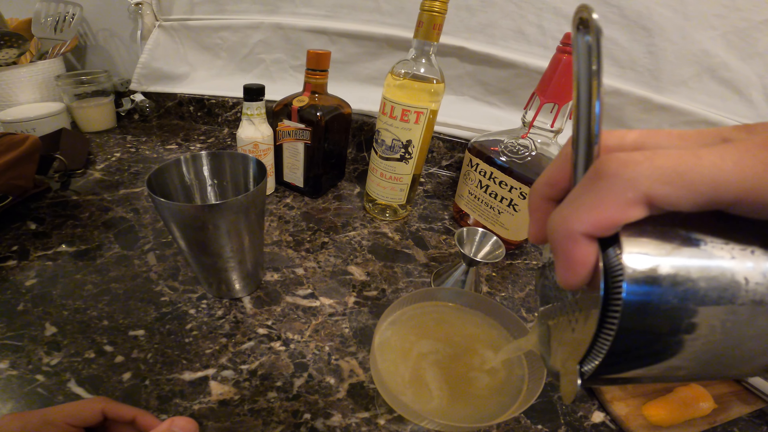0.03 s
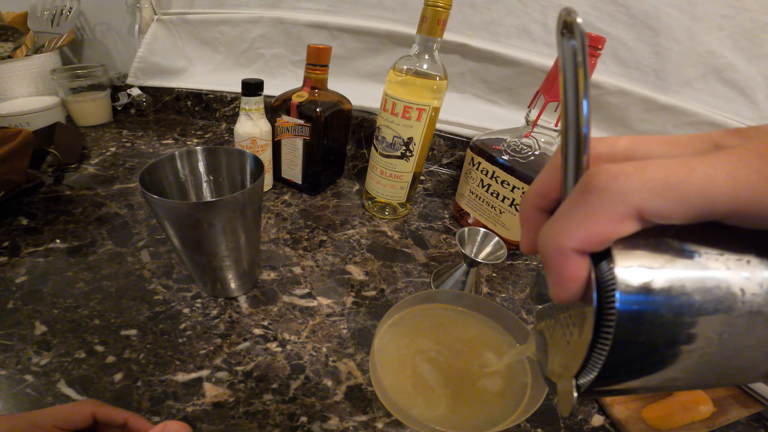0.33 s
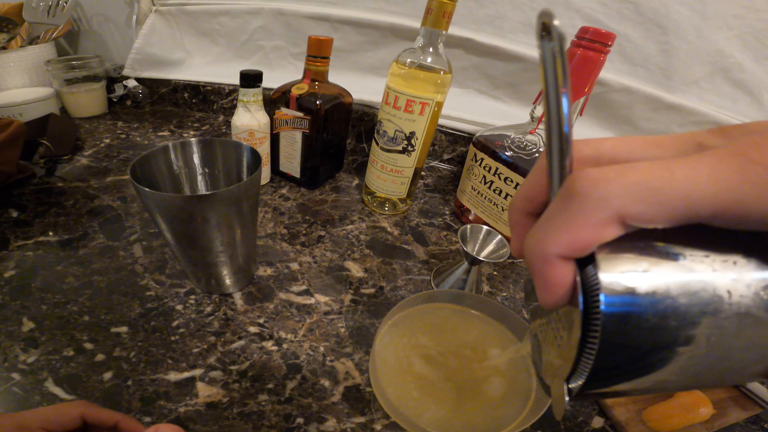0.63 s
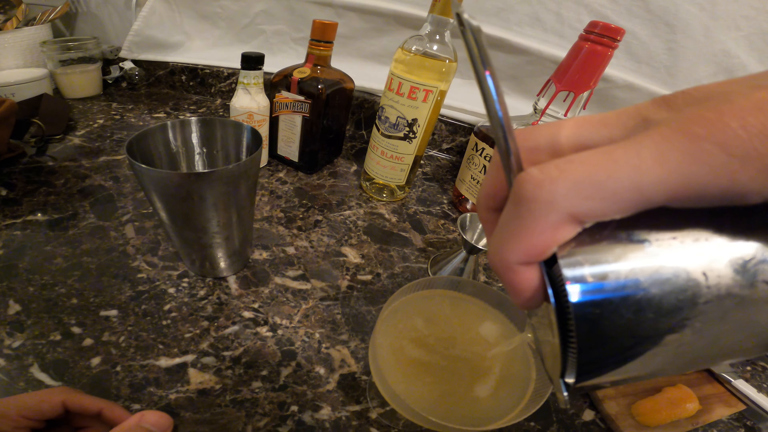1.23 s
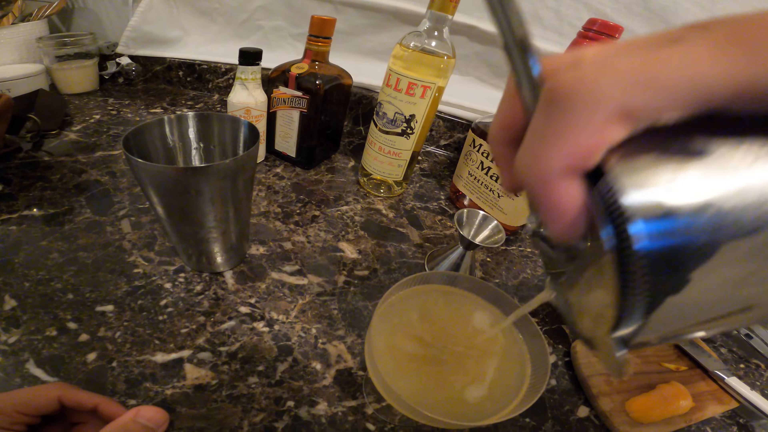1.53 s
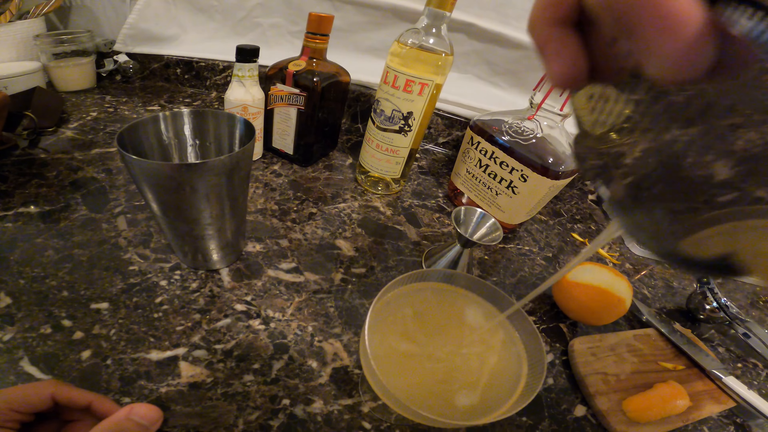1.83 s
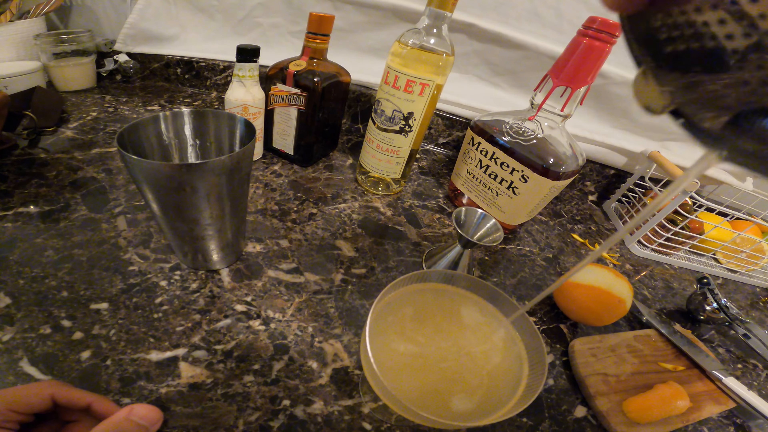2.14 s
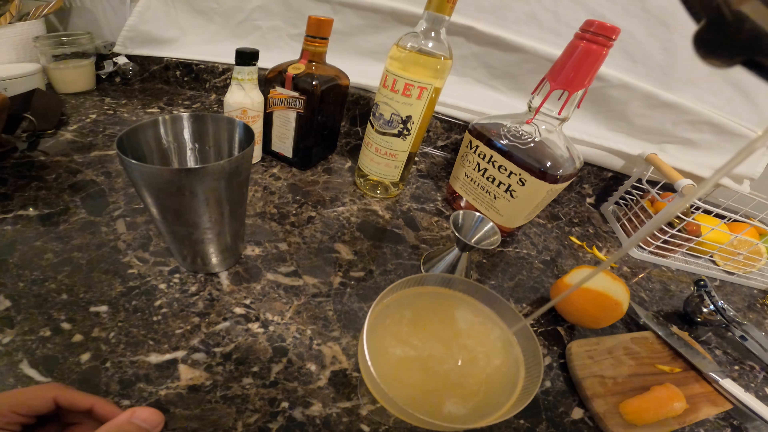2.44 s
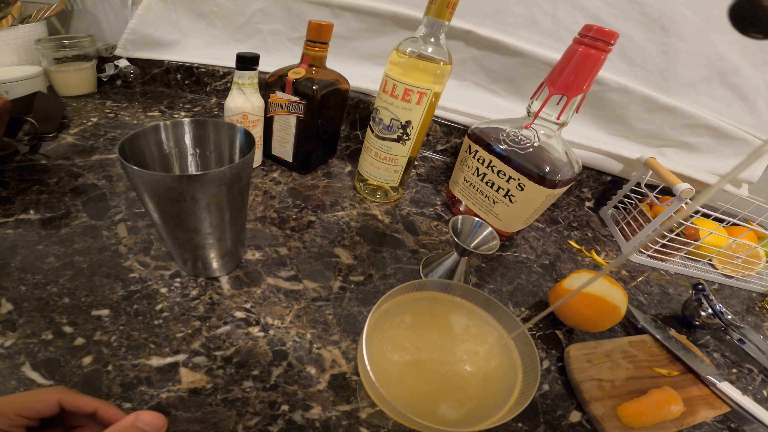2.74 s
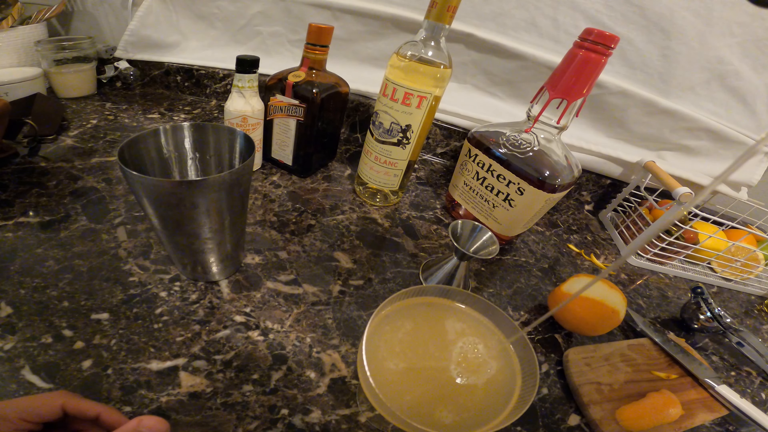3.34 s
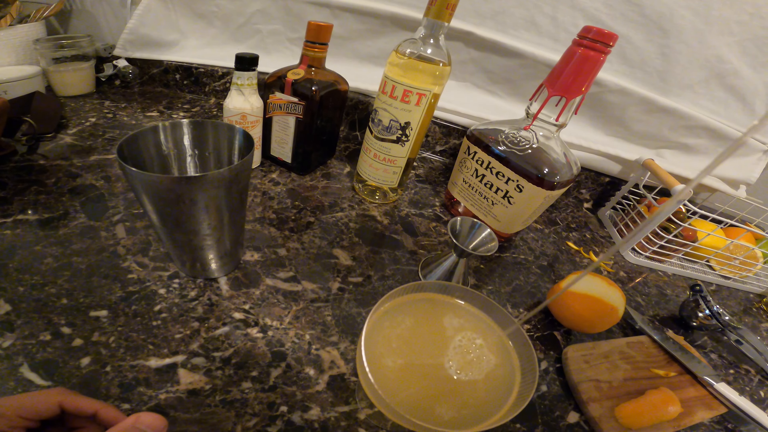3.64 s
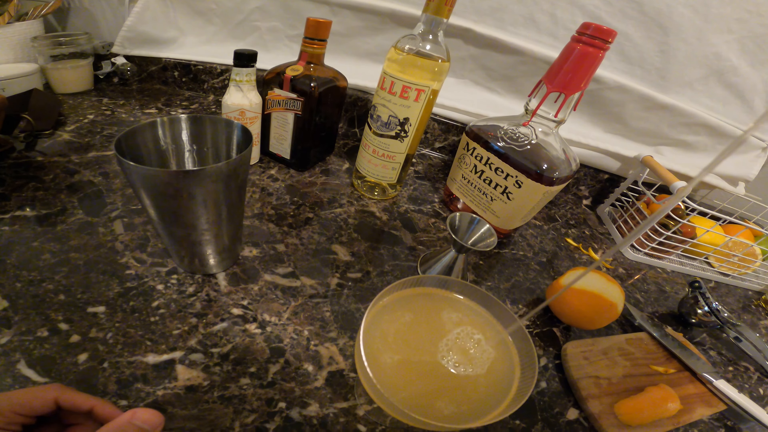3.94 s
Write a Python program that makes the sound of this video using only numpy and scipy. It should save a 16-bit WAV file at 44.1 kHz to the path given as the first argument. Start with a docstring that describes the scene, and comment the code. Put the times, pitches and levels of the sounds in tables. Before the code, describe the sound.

Close drops of a strained cocktail splash and bubble into a partly filled glass. They start past halfway, after an almost silent pour with a few soft ice ticks, while a low kitchen hum runs throughout.

```python
"""A kitchen hum and a swelling low rumble come first, with a faint trickle and ticks of ice: a cocktail
shaker drains almost silently into a cup on a stone counter. As it is lifted high, the stream breaks into
drops, at about 2.5 s. Each impact radiates a short slap, and trapped air rings as bubbles, amid spray
and fizzing foam. The cup resonates, and the counter and the room add their reflections."""
import sys
import numpy as np
from scipy import signal
from scipy.fft import rfft, irfft
from scipy.io import wavfile

SR = 44100
rng = np.random.default_rng(int(sys.argv[2]) if len(sys.argv) > 2 else 0)


def to_wav(sig):
    """Store sig (one row per channel, or 1-D mono) as 16-bit WAV at the path in sys.argv[1].

    Samples outside -1..1 are clipped; the rate is SR.
    """
    pcm = np.clip(np.atleast_2d(sig), -1, 1) * 32767
    pcm = np.round(pcm).astype(np.int16)
    wavfile.write(sys.argv[1], SR, pcm.T)  # frames by channels


N = 176400
TIME, FREQS = np.arange(N) / SR, np.fft.rfftfreq(N, 1 / SR)

# Levels in the tables are relative: each source applies its own gain.
# Bubbles trapped by large drops. Each row: start in seconds, pitch in Hz, level in dB,
# rise in fractions of the pitch per second, swell in ms, decay in ms.
TRAPPED_BUBBLES = [(2.4688, 2715, -20, -4, 0.11, 2.7), (2.4688, 3315, -16, 29, 3, 0.56),
                   (2.5012, 1690, -21.5, -10, 0.094, 4.5), (2.5076, 3010, -18.5, -4, 3.7, 0.32),
                   (2.6335, 1370, -33, 14.5, 0.041, 5.8), (2.7274, 1104, -22, 10.5, 0.12, 6.4),
                   (2.7509, 899, -32.5, 22.5, 0.2, 21), (2.7664, 2750, -18.5, 6, 0.26, 0.83),
                   (2.7738, 770, -27.5, 40, 0.99, 4.3), (2.7783, 928, -20, 75, 6.4, 2.6),
                   (2.7968, 1176, -28.5, 3, 8.3, 2), (2.7993, 1560, -23.5, 56, 0.51, 3.1),
                   (2.844, 1160, -20.5, 9, 0.078, 4), (2.8809, 2656, -21, 8, 0.044, 4),
                   (2.885, 1129, -25, 19, 12.5, 3.2), (2.931, 1099, -26.5, 19.5, 0.13, 9.5),
                   (2.9596, 830, -24.5, 51, 11, 5.1), (2.9917, 2690, -23, 10, 0.24, 2),
                   (2.9922, 1220, -20.5, 11, 0.63, 5.1), (2.9896, 1800, -23.5, 9.5, 0.22, 5.3),
                   (3.052, 2780, -11.5, 31, 0.53, 0.55), (3.051, 796, -29.5, 55, 0.36, 12),
                   (3.0607, 990, -18.5, 50.5, 7.4, 1.5), (3.0777, 2726, -24.5, 30, 0.13, 2),
                   (3.0894, 1080, -24, 67, 0.41, 2.8), (3.1545, 1853, -31, 1.5, 0.33, 5.6),
                   (3.1584, 1004, -23, -9, 1.4, 2.4), (3.1793, 1054, -14.5, 66, 3.9, 0.88),
                   (3.192, 966, -22.5, 40, 6.4, 3.2), (3.235, 1193, -26, 48, 4, 2),
                   (3.2696, 805, -29, 23, 0.11, 7.8), (3.2961, 817, -21, 31.5, 0.14, 3.2),
                   (3.2888, 1827, -29, 16.5, 8, 5), (3.3483, 2950, -26, 18, 1.48, 1.2),
                   (3.3724, 2724, -23.5, 18, 0.17, 1.2), (3.3958, 873, -30, 10.5, 0.69, 33),
                   (3.3956, 1280, -23.5, 56, 0.53, 2.1), (3.4215, 963, -29, -19.5, 0.44, 7.5),
                   (3.4613, 900, -29.5, 18, 0.12, 8.8), (3.497, 1183, -20.5, 67, 2.3, 3.3),
                   (3.6792, 1620, -15.5, 45, 0.14, 1.35), (3.6996, 957, -22.5, 39, 3.4, 4.2),
                   (3.7024, 2260, -19, -6, 0.28, 0.66), (3.8003, 2570, -20, 74, 0.58, 1),
                   (3.8218, 2510, -19.5, 39, 0.25, 1.7), (3.8305, 2290, -11, 23, 0.17, 1.7),
                   (3.849, 1177, -24.5, 2, 0.16, 4), (3.9926, 830, -21.5, 31, 4.3, 0.85)]
# Wet slaps of drops, some with a bubble ringing alongside. Each row: start in seconds, level in dB.
SMACK_HITS = [(2.633, -44.5), (2.715, -46), (2.7272, -32.5), (2.748, -45), (2.761, -38), (2.835, -41),
              (2.844, -31.5), (2.852, -40), (2.859, -44), (2.9321, -54), (2.979, -35), (3.0107, -36),
              (3.063, -35.5), (3.0904, -36), (3.154, -33.5), (3.187, -33), (3.2233, -32), (3.2615, -34),
              (3.286, -33), (3.3144, -35), (3.3961, -33), (3.4147, -38.5), (3.4607, -36), (3.473, -32.5),
              (3.5244, -31.5), (3.566, -36), (3.6207, -42), (3.6345, -38), (3.6421, -40), (3.655, -48),
              (3.752, -35), (3.7574, -41), (3.7736, -36), (3.795, -29.5), (3.848, -51), (3.872, -40),
              (3.9042, -31), (3.9767, -43), (3.9935, -35)]
# Drops that burst on the surface. Each row: start in seconds, level in dB, pitch in Hz.
SPLASH_HITS = [(2.4684, -29, 5380), (2.483, -49, 6400), (2.507, -40, 5270), (2.6344, -43.5, 6600),
               (2.746, -53, 5620), (2.765, -45, 4900), (2.8349, -46, 5670), (2.8637, -37.5, 6800),
               (2.8802, -36, 4470), (2.916, -44.5, 4870), (2.97, -42.5, 4500), (2.9696, -38, 4900),
               (3.01, -44, 5540), (3.0506, -36, 6400), (3.0886, -40.5, 5000), (3.1332, -38.5, 4300),
               (3.1862, -37, 6000), (3.226, -50, 4060), (3.2447, -35, 9670), (3.2627, -34, 5240),
               (3.3485, -36.5, 6055), (3.3733, -37.5, 6740), (3.4163, -41, 5760), (3.4622, -42.5, 5600),
               (3.4975, -41.5, 6500), (3.552, -39, 5100), (3.5671, -36, 5250), (3.6064, -40, 5820),
               (3.6677, -38.5, 5550), (3.7432, -36, 5510), (3.783, -39.5, 5120), (3.752, -42.5, 8400),
               (3.8716, -43.5, 5000), (3.914, -38.5, 5900), (3.9507, -41, 4560), (3.977, -40.5, 4700)]
# Ice against the strainer. Each row: start in seconds, level in dB, pitch in Hz, decay in ms.
ICE_TICKS = [(0.144, -56, 7100, 1.2), (.267, -57, 5600, .4), (.368, -58, 6000, .4), (.543, -50, 2186, 6),
             (.578, -54, 2100, 6), (0.949, -51, 2780, .2), (1.335, -48, 2700, .2), (1.425, -50, 2500, .2),
             (1.891, -54, 4520, 0.81)]
# Envelopes of the flow. Each row: time in seconds, level in dB.
PATTER_LEVEL = [(2.7, -19), (2.74, -5.5), (2.83, -15.5), (2.91, -12), (2.99, -3.5), (3.08, 1), (3.13, -7),
                (3.29, -5), (3.38, -5.5), (3.55, -6), (3.65, -3), (3.8, -1), (3.93, -5), (4.0, -0.5)]  # the broken stream
TRICKLE_LEVEL = [(0, -68), (.14, -70.5), (.24, -75), (0.451, -78), (1.001, -77), (1.07, -71.5), (1.3, -78),
                 (1.7, -100)]  # the drink in the strainer
# Strength of small bubbles by size. Each row: pitch in Hz, level in dB.
FROTH_LEVELS = [(550, -44), (950, -27), (1300, -25.5), (1900, -34), (2900, -23), (4000, -41), (5500, -46),
                (8000, -48), (12000, -51)]
BEAD_LEVELS = [(4300, -31), (5800, -41), (8000, -37), (10500, -44), (13500, -48)]  # the tiniest, which ping
# Spectral envelopes. Each row: frequency in Hz, gain in dB.
SMACK_SPECTRUM = [(350, -33), (1100, 10), (1700, 2), (2900, 4.5), (4100, -16), (5500, -19), (9000, -18),
                  (15000, -35)]
SPRAY_SPECTRUM = [(300, -42), (900, 3), (3000, 1.5), (4000, -22), (6000, -20), (10000, -25), (13000, -14),
                  (16000, -46)]
FIZZ_SPECTRUM = [(400, -22), (1000, -8), (3000, 13.5), (4000, 0), (5500, 4.5), (8000, -12.5),
                 (10000, -11.5), (13000, -18), (16000, -25)]
TRICKLE_SPECTRUM = [(1000, -28), (4000, -4), (5600, -4), (7500, -3), (9000, -15), (13000, -14),
                    (15000, -38)]
AIR_SPECTRUM = [(12, -41), (22, -4), (42, 4), (62, -4.5), (92, -2), (135, -5.5), (170, -2.5), (194, -9),
                (220, 1.5), (280, 1.5), (350, -9), (460, -9), (640, -16.5), (950, -17.5), (1300, -21),
                (1650, -24), (2000, -31.5), (2600, -32), (3500, -37.5), (4200, -41), (5200, -37),
                (6300, -43), (8000, -47), (10000, -50.5), (12500, -52.5), (14000, -82.5), (16000, -89.5)]
MIC_RESPONSE = [(7000, 0), (10200, -1), (11500, -5), (13500, -8), (16000, -16)]
# Modes of the cup. Each row: frequency in Hz, bandwidth in Hz, gain in dB.
CUP_RESONANCES = [(472, 17, 10.5), (592, 18, 12.5), (843, 3.1, -2), (896, 8.1, 3), (954.3, 11.3, 5),
                  (1123, 6.6, 5.5), (1178, 1.4, -2), (1220, 2.5, -9), (1632, 7.4, -9), (2010, 26, 4.5),
                  (1885, 29, -7), (2290, 17, -1), (2623, 26, -1.5), (3200, 21, -4)]
# Resonances of a fan. Each row: frequency in Hz, half-width in Hz, level in dB.
FAN_RESONANCES = [(166, 10, -58), (226.3, 7, -49), (243.4, 7.8, -60.5), (288, 37, -53.5), (3286, 50, -76.5),
                  (3680, 36, -78.5)]
# Tones of a motor, likely the fridge. Each row: frequency in Hz, level in dB.
MOTOR_TONES = [(446.8, -72.5), (829.0, -74), (888.2, -67), (1244, -66.5), (1303, -74.5), (1362, -73),
               (1421, -77), (1534, -74.5), (1593, -71.5), (1771, -86.5), (2067, -82), (2304, -78),
               (4845, -81), (5243, -91)]
# Course of the low rumble. Each row: time in seconds, level in dB, pitch in Hz.
RUMBLE_COURSE = [(0.0, -29, 36.2), (0.24, -49.5, 39.5), (0.58, -53, 35.1), (1.02, -52, 41.65),
                 (1.21, -33, 41.8), (1.41, -46.5, 39.24), (1.71, -27, 37.7), (2.19, -48.5, 38.1),
                 (2.31, -75, 39), (2.78, -55, 37.3), (2.92, -48, 42.1), (3.12, -47, 41.88),
                 (3.23, -30.5, 39.5), (3.71, -36, 37.47), (3.88, -51, 39), (4.0, -42, 35)]
# Reverberation. Each row: frequency in Hz, time to fall by 60 dB in seconds.
NEAR_T60 = [(200, 0.1), (1000, 0.061), (3000, 0.04), (6000, 0.068), (14000, 0.033)]  # cup, bottles and counter
ROOM_T60 = [(200, 0.18), (1000, 0.67), (3000, 0.34), (6000, 0.4), (14000, 0.11)]
# Coherence of the air noise. Each row: frequency in Hz, correlation of left and right.
AIR_COHERENCE = [(60, 0.85), (110, 0.9), (180, 1), (320, 0.94), (570, 0.88), (1000, 0.39), (1750, 0.55),
                 (3070, 0.31)]
# Stereo balance. Each row: frequency in Hz, left minus right level in dB.
CUP_BALANCE = [(300, -4), (520, 3.5), (1050, -0.5), (1500, -4), (2150, 0.5), (3070, .5), (4500, -5.5),
               (7000, -6.5), (10000, -9.5)]
HUM_BALANCE = [(60, 1), (93, -0.5), (140, 2.5), (220, 0.5), (340, 0), (530, 7), (830, 2), (1280, 5.0),
               (1980, 4), (3070, 1)]


def drops():
    """Impact and air entrainment: a drop slaps and leaves a bubble; a slow swell has hardly any slap."""
    bubbles, slaps = np.zeros((2, N))
    for start, hz, db, rise, swell_ms, decay_ms in TRAPPED_BUBBLES:
        add(bubbles, start, amp(db) * ring(hz, rise, swell_ms, decay_ms))
        add(slaps, start, amp(db - 10) / (1 + swell_ms ** 2) * crack(decay_ms=0.14, snap_db=-7))
    return bubbles + colour(slaps, SPRAY_SPECTRUM)


def ring(hz, rise, swell_ms, decay_ms):
    """A damped oscillator swells and dies; positive rise is the climb of a bubble nearing the surface."""
    t = np.arange(SR // 16) / SR
    ms = t * 1000
    swell_ms = max(swell_ms, .05)
    swell = np.minimum(ms / swell_ms, 1) ** 1.75
    decay = np.exp(-np.maximum(ms - swell_ms, 0) / decay_ms)
    pitch = np.minimum(hz * (1 + rise * t), SR / 2)
    return swell * decay * np.sin(2 * np.pi * np.cumsum(pitch) / SR)


def crack(decay_ms, snap_db):
    """An impact is broadband: one pulse at contact, then exponentially decaying noise."""
    ms = np.arange(SR // 32) * 1000 / SR
    burst = rng.standard_normal(len(ms)) * np.exp(-ms / decay_ms) * (ms > 0)
    return burst + 2 * amp(snap_db) * (ms == 0)


def smacks():
    """Impact noise: drops hit the drink with wet, pitchless slaps, each a pulse and a short splatter."""
    out = np.zeros(N)
    for start, db in SMACK_HITS:
        add(out, start, amp(db + 11.5) * crack(decay_ms=1.75, snap_db=3))
    return colour(out, SMACK_SPECTRUM)


def splashes():
    """Bursting drops tick with an upward glide; at equal damping per cycle, higher ones die sooner."""
    out = np.zeros(N)
    for start, db, hz in SPLASH_HITS:
        tone = ring(hz, rise=46, swell_ms=1, decay_ms=0.58 * 5000 / hz)
        impact = amp(6) * crack(decay_ms=1.06, snap_db=9.5)
        add(out, start, amp(db + 5) * tick(tone, impact, hz))
    return out


def tick(tone, impact, hz):
    """A resonant impact: the crack, band-passed around the pitch, is added into the ringing tone."""
    band = np.clip([hz / 1.25, hz * 1.25], 100, .49 * SR)
    add(tone, 0, signal.lfilter(*signal.butter(1, band, "band", fs=SR), impact))
    return tone


def surge(jump_db=5, width_s=0.0029):
    """Amplitude modulation of the fine splashing: it follows the stream and jumps at each large drop."""
    pulses = [(TIME >= start) * np.exp(-abs(TIME - start) / width_s) for start, *_ in TRAPPED_BUBBLES]
    stirred = np.max(pulses, axis=0)
    return amp(np.interp(TIME, *np.transpose(PATTER_LEVEL)) - 7.5 + jump_db * stirred)


def froth(levels, cycles, spread_db, count, mean_rise=18.64):
    """Bubble resonance varies inversely with radius: the smaller, the higher and shorter the ring."""
    out = np.zeros(N)
    start, end = PATTER_LEVEL[0][0], PATTER_LEVEL[-1][0]
    low_hz, high_hz = levels[0][0], levels[-1][0]
    for when, smallness, climb, chance, damping in rng.random((count, 5)):
        hz = low_hz * (high_hz / low_hz) ** smallness
        db = read(levels, hz) + spread_db * (min(-np.log(1 - chance), 2) - .5)
        decay_ms = 1000 * cycles * (.5 + damping) / hz
        bubble = ring(hz, 2 * climb * mean_rise, decay_ms * climb / 2, decay_ms)
        add(out, start + when * (end - start), amp(db) * bubble)
    return out


def spray(spectrum, level_db, spread_db, count):
    """Shot noise: tiny droplets or bursting foam click at random while the stream patters."""
    clicks = np.zeros(N)
    start, end = PATTER_LEVEL[0][0], PATTER_LEVEL[-1][0]
    when, chance, sign = rng.random((count, 3)).T
    samples = np.minimum((start + when * (end - start)) * SR, N - 1).astype(int)
    db = level_db + spread_db * np.minimum(-np.log(1 - chance), 3)
    np.add.at(clicks, samples, np.sign(sign - .5) * amp(db))
    return colour(clicks, spectrum)


def fizz(growth_db_per_s=4.5):
    """Foam bursts in clicks, uncorrelated between left and right, that grow louder as it gathers."""
    growth = amp(growth_db_per_s * (TIME - PATTER_LEVEL[0][0]))
    sides = [spray(FIZZ_SPECTRUM, level_db=-45, spread_db=8, count=3500) for _ in range(2)]
    return growth * np.array(sides)


def cup_ring(x):
    """Modal resonance: the wall and hollow of the cup ring on after each drop."""
    response = sum(amp(db) / (1 + 2j * (FREQS - hz) / width) for hz, width, db in CUP_RESONANCES)
    return signal.fftconvolve(x, irfft(response, N)[:SR // 4])[:N]


def ice():
    """Solid contact: ice knocks on the strainer in heavily damped ticks, a few of which ring."""
    out = np.zeros(N)
    for start, db, hz, decay_ms in ICE_TICKS:
        tone = ring(hz, rise=0, swell_ms=0, decay_ms=decay_ms)
        add(out, start, amp(db + 1.5) * tick(tone, crack(decay_ms=5, snap_db=-8), hz))
    return out


def trickle(bursts_per_s=430):
    """A Poisson process: tiny bubbles burst independently in the coil of the strainer."""
    clicks = rng.standard_normal(N) * (rng.random(N) < bursts_per_s / SR)
    level = amp(np.interp(TIME, *np.transpose(TRICKLE_LEVEL)))
    return level * unit(colour(clicks, TRICKLE_SPECTRUM))


def hum():
    """Incoherent sources add in power: steady air noise and fan resonances, joined by a motor's whine."""
    common, separate = rfft(rng.standard_normal((2, N)))
    coherence = np.clip(read(AIR_COHERENCE, FREQS), 0, 1)
    pair = np.array([common, coherence * common + np.sqrt(1 - coherence ** 2) * separate])
    air_power = (amp(-42.5) * unit(amp(read(AIR_SPECTRUM, FREQS)))) ** 2
    fan_power = sum((amp(db) * unit(1 / (1 + ((FREQS - hz) / width) ** 2))) ** 2
                    for hz, width, db in FAN_RESONANCES)
    noise = irfft(pair * np.sqrt(air_power + fan_power), N)
    return stereo(noise + whine(), HUM_BALANCE)


def whine(waver_rad=0.44):
    """Slow random phase modulation makes each thin motor tone waver."""
    knots = np.linspace(0, N / SR, 20)
    out = np.zeros(N)
    for hz, db in MOTOR_TONES:
        phase = 2 * np.pi * rng.random()
        waver = waver_rad * np.interp(TIME, knots, rng.standard_normal(len(knots)))
        out += np.sqrt(2) * amp(db - 0.5) * np.sin(2 * np.pi * hz * TIME + phase + waver)
    return out


def rumble():
    """A very low tone, modulated in amplitude and frequency, swells and fades."""
    times, db, hz = np.transpose(RUMBLE_COURSE)
    phase = 2 * np.pi * np.cumsum(np.interp(TIME, times, hz)) / SR
    return np.sqrt(2) * amp(np.interp(TIME, times, db) - 1.5) * np.sin(phase)


def echoes(x, t60s, channels=2):
    """Reverberation: dense reflections decay exponentially, each band at its own rate."""
    shape = (channels, SR // 2)
    reflections = rng.standard_normal(shape) * (rng.random(shape) < .15)
    hz, t, bands = signal.stft(reflections, SR, nperseg=128)
    decay = amp(-60 * t / read(t60s, hz)[:, None])
    tail = signal.istft(bands * decay, SR, nperseg=128)[1]
    tail[:, :SR // 700] = 0  # the gap before the first reflection
    tail /= np.sqrt(np.mean(abs(rfft(tail)[:, 400:2000]) ** 2))  # unit gain in the midrange
    return signal.fftconvolve(x[None], tail, axes=1)[:, :N]


def stereo(pair, balance, left_lag_ms=0.053):
    """Time and level cues: the left of two close microphones hears later, and each has its own shading."""
    hz = np.fft.rfftfreq(2 * N, 1 / SR)
    half_db = read(balance, hz) / 2
    lag = np.exp(-2j * np.pi * hz * left_lag_ms / 1000)
    response = np.array([amp(half_db) * lag, amp(-half_db)])
    return irfft(rfft(pair, 2 * N) * response)[:, :N]


def colour(x, spectrum):
    """A minimum-phase filter: its phase follows from the log gain by the Hilbert transform."""
    hz = abs(np.fft.fftfreq(4096, 1 / SR))
    log_gain = np.log(amp(read(spectrum, hz)))
    taps = np.fft.ifft(np.exp(np.conj(signal.hilbert(log_gain)))).real
    return signal.oaconvolve(x, taps[:len(taps) // 2])[:N]


def amp(db):
    """Decibels to amplitude ratio."""
    return 10 ** (np.asarray(db) / 20)


def unit(x):
    """Normalisation to an rms of 1."""
    return x / np.sqrt(np.mean(x ** 2) + 1e-20)


def read(points, hz):
    """Interpolation on a logarithmic frequency axis."""
    frequencies, values = np.transpose(points)
    return np.interp(np.log(hz + 1), np.log(frequencies + 1), values)


def add(mix, start_s, sound):
    """Superposition: a sound joins the mix at its start time."""
    part = mix[max(round(start_s * SR), 0):][:len(sound)]
    part += sound[:len(part)]


def scene():
    """Direct sound, cup resonance and reflections superpose on the background of the kitchen."""
    patter = surge()
    small_bubbles = froth(FROTH_LEVELS, cycles=5.7, spread_db=4.5, count=800)
    small_bubbles += froth(BEAD_LEVELS, cycles=6.8, spread_db=5.5, count=170)
    pour = drops() + smacks() + splashes() + ice() + trickle()
    pour += patter * (small_bubbles + spray(SPRAY_SPECTRUM, level_db=-21, spread_db=4, count=420))
    foam = patter * fizz()
    near = pour + cup_ring(pour) + amp(-9) * echoes(pour, NEAR_T60, channels=1)
    room = amp(-12) * echoes(pour, ROOM_T60)
    return stereo(near + foam + room, CUP_BALANCE) + hum() + rumble()


def record(dry):
    """Band limiting: the microphone softens the treble, and a steep low-pass ends it at 15.7 kHz."""
    heard = np.array([colour(channel, MIC_RESPONSE) for channel in dry])
    low_pass = signal.firwin(255, 15700, window=("kaiser", 9), fs=SR)
    return signal.oaconvolve(heard, low_pass[None], "same")


dry = scene()
out = record(dry)
to_wav(out)
```